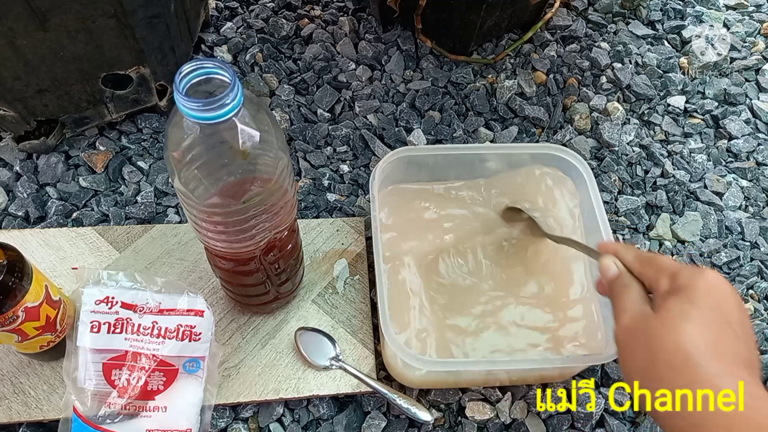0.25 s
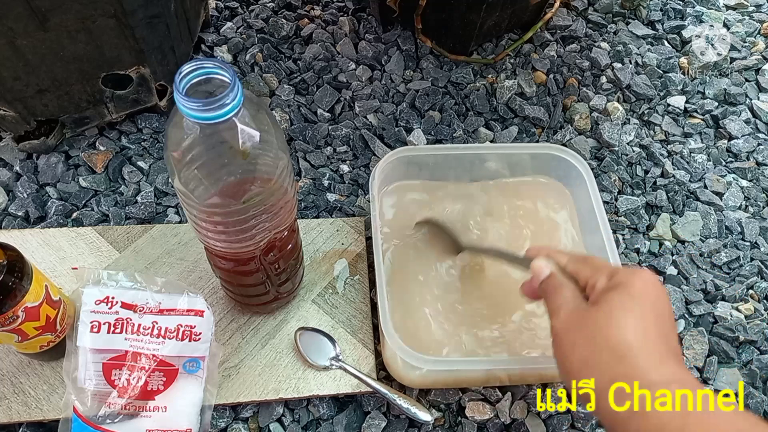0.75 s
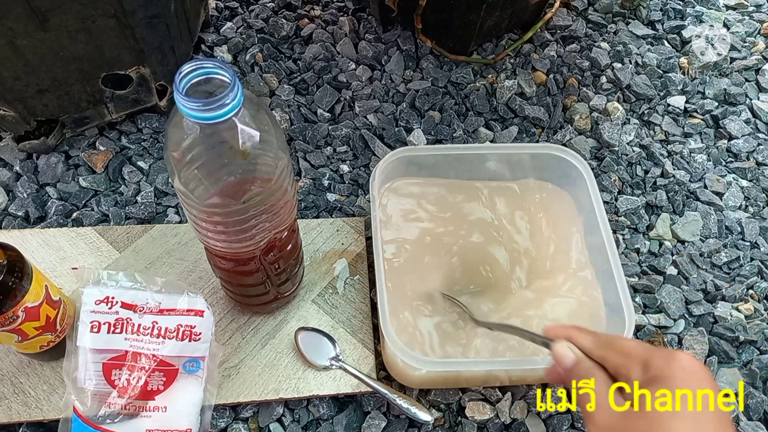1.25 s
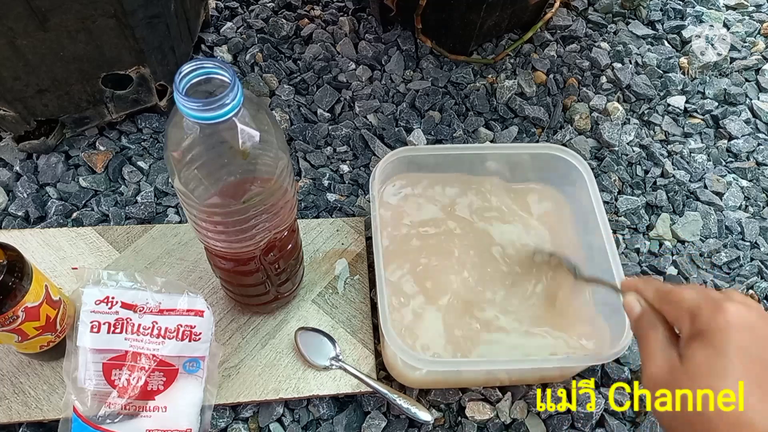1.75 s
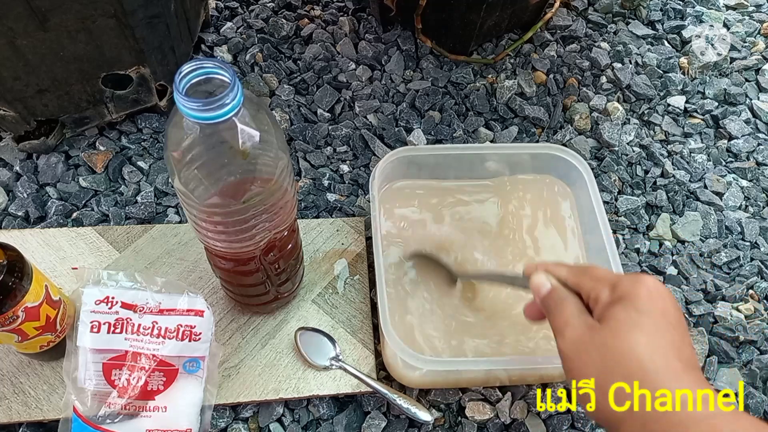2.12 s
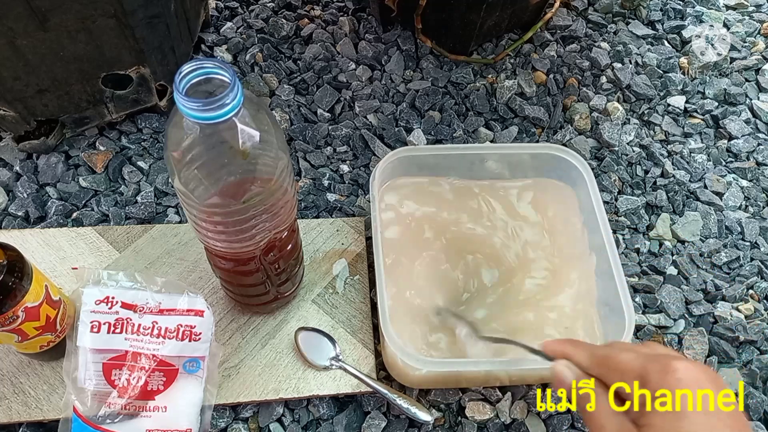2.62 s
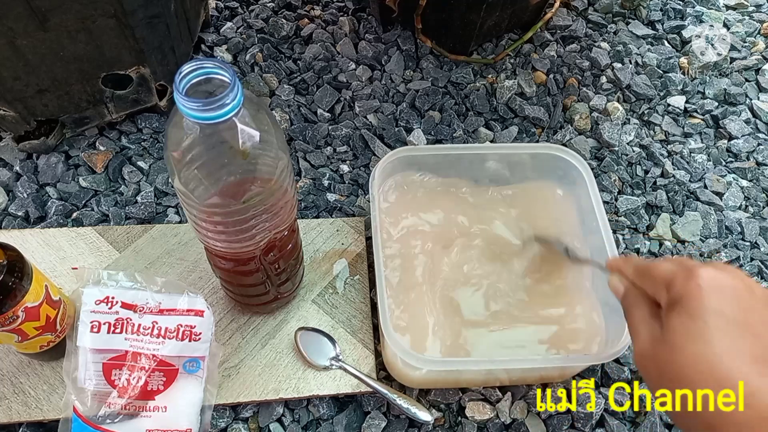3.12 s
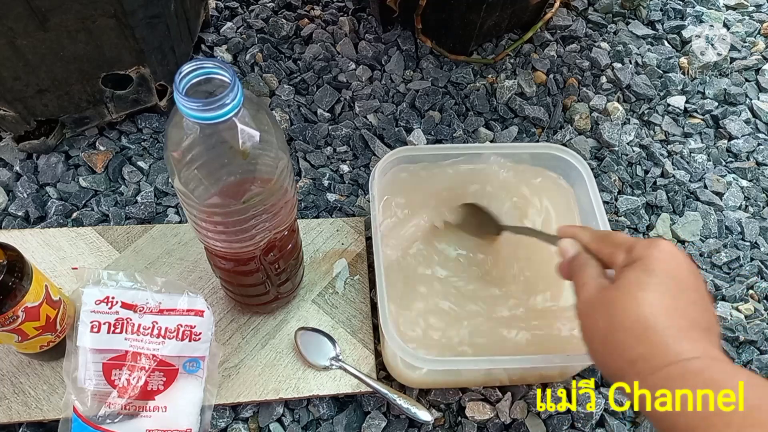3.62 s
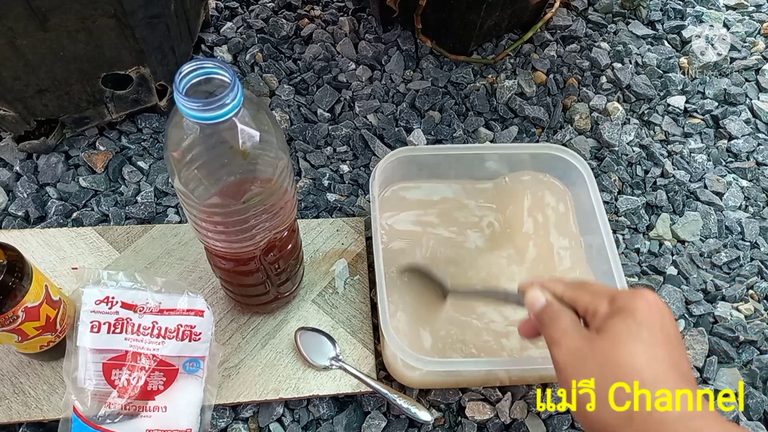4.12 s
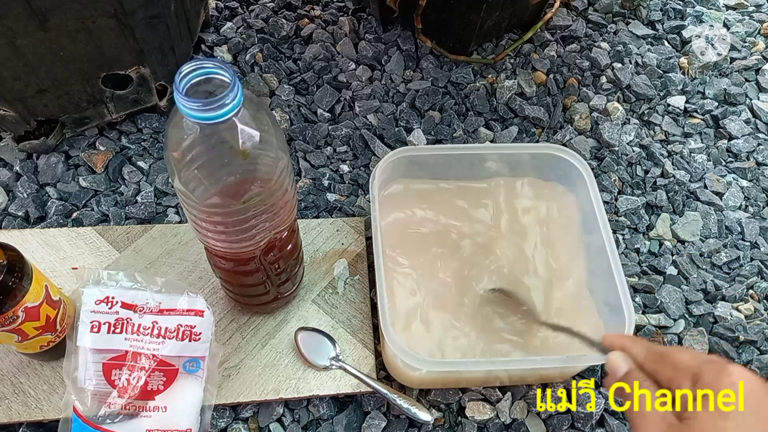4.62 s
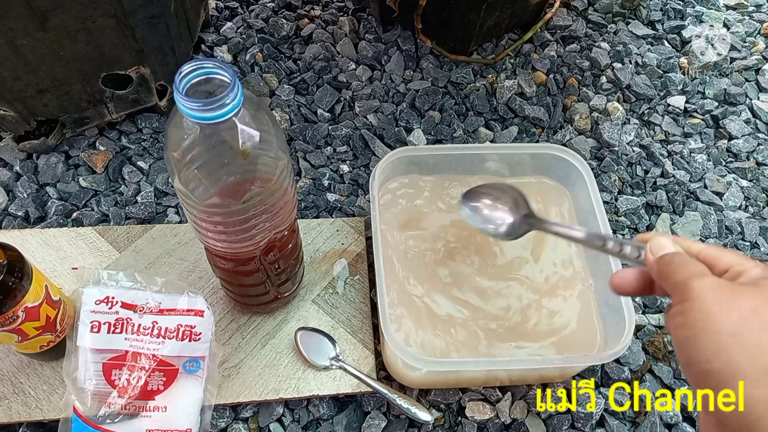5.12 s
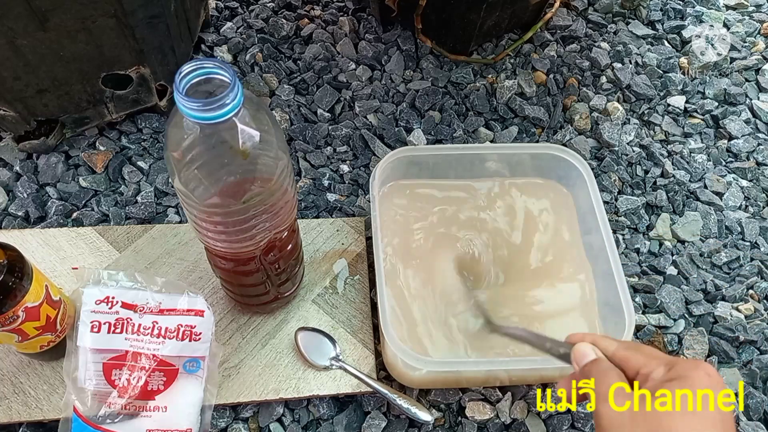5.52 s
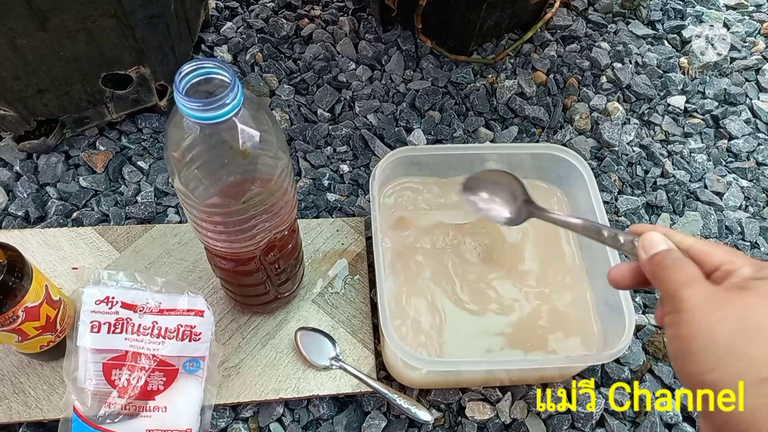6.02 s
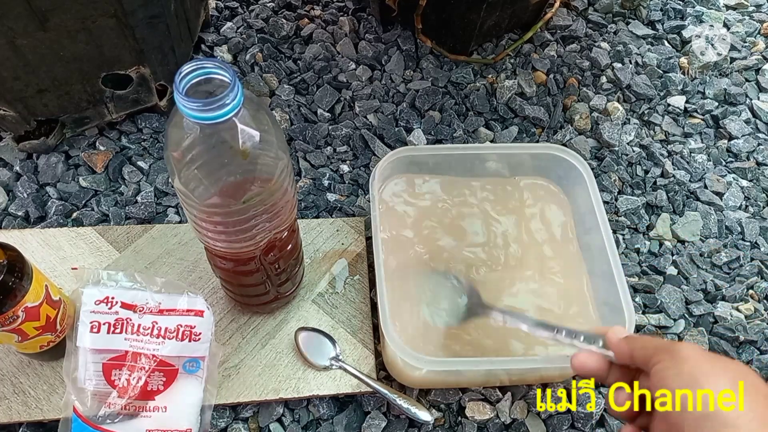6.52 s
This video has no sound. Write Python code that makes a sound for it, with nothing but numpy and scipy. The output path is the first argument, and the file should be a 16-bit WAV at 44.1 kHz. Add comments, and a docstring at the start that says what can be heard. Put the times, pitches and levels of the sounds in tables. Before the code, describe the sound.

A metal spoon stirs thin liquid in a plastic tub outdoors, sloshing and gurgling with dull knocks while wind buffets the microphone.

```python
"""Outdoors, a steel spoon stirs a thin liquid in a plastic tub. From the start leaves hiss, a far motor
drones as two narrow bands of noise, and drag, gurgling bubbles and fizz swell with every stroke.
Pops and gulps come at once as ringing and gliding sines, then knocks that ring the tub walls.
Gusts of coloured noise batter mostly the right microphone port from 1 to 3 s, then ease. After 5.2 s the
spoon strikes near the rim, loudest at about 5.5 s; hiss and fizz grow and gusts return, leaning left."""
import sys
import numpy as np
from scipy import signal
from scipy.fft import rfft, irfft, next_fast_len
from scipy.io import wavfile

SR = 44100
rng = np.random.default_rng(int(sys.argv[2]) if len(sys.argv) > 2 else 0)


def put_to_file(sound):
    """Save the sound as 16-bit audio at rate SR, in the file named by the first command-line argument."""
    columns = np.atleast_2d(sound).T  # one column per channel
    safe = np.clip(columns, -1, 1)
    whole_steps = np.round(safe * 32767)
    wavfile.write(sys.argv[1], SR, whole_steps.astype(np.int16))


N = 297749


def amp(db):
    """dB to gain."""
    return 10 ** (np.asarray(db) / 20)


def rms_one(x):
    """Scale to rms 1."""
    return x / np.sqrt(np.mean(x ** 2, axis=-1, keepdims=True) + 1e-20)


def at_samples(t, values):
    """Draw a curve through its points, one value a sample."""
    return np.interp(np.arange(N) / SR, t, values)


def in_time(rows):
    """Turn each column of a table of times into a curve."""
    s, *columns = np.transpose(rows)
    return [at_samples(s, c) for c in columns]


def drift(rate_hz):
    """Slow chance in two channels: smoothed noise of rms 1, made at every 40th sample."""
    step, warm_up = 40, 2000
    r = np.exp(-2 * np.pi * rate_hz * step / SR)
    noise = rng.standard_normal((2, N // step + 2 + warm_up))
    slow = rms_one(signal.lfilter([1], [1, -2 * r, r * r], noise)[:, warm_up:])
    return np.array([np.interp(np.arange(N) / step, np.arange(len(v)), v) for v in slow])


def colour(x, spectrum):
    """Give a white signal the spectrum of a table; rms 1."""
    size = next_fast_len(N)
    hz, level_db = np.transpose(spectrum)
    log_hz = np.log(np.maximum(np.fft.rfftfreq(size, 1 / SR), 1))
    gain = amp(np.interp(log_hz, np.log(hz), level_db, left=-90, right=-90))
    return rms_one(irfft(rfft(x, size) * gain, size)[..., :N])


def band_pass(band_hz):
    """Second-order band filter as sections."""
    return signal.butter(2, band_hz, "band", fs=SR, output="sos")


def ring(clicks, hz, t60):
    """A resonance: a unit click sets a sine of height 1 ringing, down 60 dB after t60 seconds."""
    r = amp(-60 / (max(t60, .002) * SR))
    w = 2 * np.pi * hz / SR
    return signal.lfilter([0, np.sin(w)], [1, -2 * r * np.cos(w), r * r], clicks + 1e-18)


def ring_time(width_hz):
    """The narrower a resonance, the longer its t60."""
    return np.log(1000) / np.pi / width_hz


def grains(per_s, spread_db, channels):
    """Random clicks of uneven size and sign."""
    shape = (channels, N)
    sizes = amp(spread_db * np.minimum(rng.exponential(1, shape), 5))
    sizes = sizes * rng.choice([-1, 1], shape)
    return sizes * (rng.random(shape) < per_s / SR)


def add(out, s, sound):
    """Mix a short sound in at a time."""
    i = round(s * SR)
    out[i:i + len(sound)] += sound[:N - i]


def above(hz, bright_db):
    """Brightness lifts what lies above 1.8 kHz."""
    return amp(bright_db / (1 + (1800 / hz) ** 8))


def swells(rows, rise, fall):
    """Each row's power envelope: it climbs and sinks at steady dB a second around a hold at 1."""
    t = np.arange(0, N + 64, 64) / SR
    centre, hold = np.transpose(rows)[:2, :, None]
    early = centre - np.abs(hold) / 2 - t
    late = t - centre - np.abs(hold) / 2
    return t, amp(-2 * (rise * np.maximum(early, 0) + fall * np.maximum(late, 0)))


# Spectrum of leaves and far hiss. Each row: frequency in Hz, relative density in dB per Hz.
AIR_SPECTRUM = [(180, 1), (300, 11.5), (480, 0.5), (680, -6.5), (850, -6.5), (1480, -4.5), (2520, -8.5),
                (2890, -4), (6450, -25), (8020, -1), (14400, -35), (15700, -28), (16500, -65)]
# Loudness of the hiss. Each row: time in seconds, level in dB.
AIR_LEVEL = [(0, -56.5), (2.5, -55), (3.5, -62.5), (5.1, -58), (5.3, -52), (5.9, -47.5), (6.2, -44.5),
             (6.75, -45)]
# Loudness of the far motor. Each row: time in seconds, level in dB.
DRONE_LEVEL = [(0, -39), (1, -32), (3, -59.5), (4.5, -53.5), (5, -37), (5.4, -29.5), (5.7, -73),
               (6.75, -49)]
# Hums of the motor. Each row: pitch in Hz, width in Hz, level in dB under the loudness curve.
DRONE_LINES = [(121.1, 14, -4), (211.4, 7.3, -19)]


def background():
    """Smooth hiss, unrelated left and right, and a drone of narrow noise bands common to both."""
    hiss = colour(rng.standard_normal((2, N)), AIR_SPECTRUM)
    air = amp(in_time(AIR_LEVEL)[0] + 0.5 * drift(18)) * hiss
    noise = rng.standard_normal(N)
    drone = sum(amp(db) * rms_one(ring(noise, hz, ring_time(width_hz)))
                for hz, width_hz, db in DRONE_LINES)
    return air + amp(in_time(DRONE_LEVEL)[0]) * drone


# Steady wind on the ports. Each row: time in seconds, rumble level in dB, left minus right in dB.
# Levels here and in the buffets are relative: gusts() lifts both alike.
STEADY_WIND = [(0, -47.5, -9), (.69, -36, 0), (.96, -38.5, -11), (1.3, -63, -1), (1.65, -25, -5),
               (2.0, -33, 22), (2.16, -34, -9), (2.5, -30.5, -19), (2.84, -30.5, 3), (3.12, -67, 12),
               (3.2, -58.5, 6), (3.52, -54.5, 16), (3.8, -45, -7), (4.46, -55.5, 4), (5.3, -47, 0),
               (5.68, -51, 23), (5.9, -33.5, 24), (6.35, -32.5, 39), (6.75, -42, 4)]
# Short swells of the wind. Each row: centre in seconds, hold in seconds, rumble level in dB,
# left minus right in dB.
BUFFETS = [(1.028, 0.011, -23.5, -8), (1.134, 0.012, -17.5, -15.5), (1.219, 0.038, -18.5, -35),
           (1.369, 0.023, -18, -17), (1.424, 0.017, -21.5, -16), (1.512, 0.017, -15.5, -8),
           (1.76, 0.028, -15.5, -26), (1.81, 0.053, -19.5, -4), (1.899, 0.036, -14, -22),
           (1.933, 0.013, -11.5, -16), (2.053, 0.025, -17, -7.5), (2.223, 0.015, -13, -41),
           (2.374, 0.085, -20, -20), (2.62, 0.03, -21.5, -18), (2.725, 0.0099, -15.5, -20),
           (2.774, 0.022, -20, -11), (3.693, 0.095, -40.5, -5.5), (5.805, 0.0086, -25.5, 5),
           (5.963, 0.034, -32, 32), (6.077, 0.008, -26, 27), (6.156, 0.017, -13.5, 2),
           (6.253, 0.0066, -20, 4.5), (6.447, 0.025, -28, 6), (6.55, 0.1, -36, -17)]
BUFFET_RISE_DB_PER_S, BUFFET_FALL_DB_PER_S = 303, 306


def port_powers(level_db, left_minus_right_db):
    """Share the power of a gust out between the left and right port."""
    ratio = amp(2 * left_minus_right_db)
    shares = np.array([ratio, np.ones_like(ratio)]) / (1 + ratio)
    return 4 * amp(2 * level_db) * shares


def gusts():
    """Gain of the wind on each port: steady wind and buffets add in power."""
    t, shape = swells(BUFFETS, BUFFET_RISE_DB_PER_S, BUFFET_FALL_DB_PER_S)
    bumps = port_powers(*np.transpose(BUFFETS)[2:]) @ shape
    steady = port_powers(*in_time(STEADY_WIND))
    return np.sqrt(steady + [at_samples(t, side) for side in bumps])


# Spectra of the slow rumble and fast flutter. Each row: frequency in Hz, relative density in dB per Hz.
RUMBLE_SPECTRUM = [(12, -47), (20, -45), (46, 5), (75, 9), (121, 4.5), (161, -6), (300, -18), (390, -96)]
FLUTTER_SPECTRUM = [(100, -22), (200, 5.5), (300, -4), (450, -17), (700, -29), (1200, -31.5)]
# Single eddies slapping the right port. Each row: time in seconds, relative level in dB, pitch in Hz.
SLAPS = [(1.129, -7, 133), (1.206, -18, 136), (1.507, -1, 142), (1.784, -8, 159), (1.946, 5.5, 164),
         (1.959, -3.5, 206), (2.055, 0, 152), (2.189, -13, 196), (2.21, 8.5, 200), (2.233, 2, 318),
         (2.253, -4.5, 293), (2.366, -2, 212), (2.699, -1, 190), (2.717, -1, 270)]


def wind():
    """Eddies hit each port on its own; the fast flutter comes in sharper lumps and grows less than the rumble."""
    rumble = colour(rng.standard_normal((2, N)), RUMBLE_SPECTRUM)
    rumble = rms_one(rumble * amp(2.5 * drift(25.6)))
    flutter = colour(rng.standard_normal((2, N)), FLUTTER_SPECTRUM)
    flutter = rms_one(flutter * amp(2.9 * drift(43)))
    ports = gusts()
    out = ports * rumble + amp([[-19], [-22.5]]) * ports ** 0.83 * flutter
    for s, level_db, hz in SLAPS:
        turns = np.arange(round(3 * SR / hz)) * hz / SR - .9
        push_suck = -np.tanh(0.77 * np.sin(2 * np.pi * turns)) * np.exp(-(turns / 0.46) ** 2)
        add(out[1], s - .5 / hz, amp(level_db) * push_suck)
    return out


# The liquid between surges. Each row: time in seconds, drag and gurgle in dB (before each layer's trim),
# their brightness above 1.8 kHz in dB, fizz in dB.
SWIRL = [(0, -46, -5, -57.5), (.45, -56, -4, -57), (1, -45.5, -8, -53), (1.35, -86, -10, -53),
         (1.9, -64, -5, -54), (2.5, -58, -4, -56.5), (2.9, -57, -6, -52.5), (3.1, -62, 9, -64),
         (3.55, -56.5, -9, -52), (4.05, -60.5, 3, -53), (4.4, -56, 10, -55.5), (4.8, -76, -5.5, -54),
         (5.13, -60, -5, -54.5), (5.3, -95, 12, -47), (5.85, -68.5, 24, -46.5), (6.15, -74, 27, -39.5),
         (6.5, -77, 5, -49.5), (6.75, -77, 2, -40)]
# Surges as the spoon digs in or turns. Each row: centre in seconds, hold in seconds, then drag and gurgle,
# brightness and fizz in dB as above.
STROKES = [(0.062, 0.13, -41.5, -13, -59), (0.166, 0.085, -40.5, -11, -49), (0.374, 0.067, -52.5, 1.5, -74),
           (0.544, 0.042, -39.5, -2, -44.5), (0.82, 0.059, -42.5, -2.5, -44),
           (0.893, 0.019, -48.5, 12, -47.5), (1.126, 0.082, -53, 9, -59), (1.223, 0.016, -36, -9, -41.5),
           (1.459, 0.046, -39, -7.5, -62), (1.571, 0.11, -42.5, 0, -46), (1.733, 0.086, -49.5, 22, -46),
           (1.798, 0.05, -27, -15.5, -46), (1.951, 0.025, -47, 10, -42), (2.067, 0.11, -40, -10.5, -68),
           (2.183, 0.17, -50, -12, -50), (2.324, 0.096, -46.5, -0.5, -58.5), (2.622, 0.092, -42, -4.5, -55),
           (2.793, 0.049, -36.5, -13, -73), (2.98, 0.072, -46.5, -5, -51), (3.18, 0.023, -71, 13, -49.5),
           (3.218, 0.028, -46, -5, -71), (3.335, 0.055, -52, -9, -53), (3.65, 0.068, -60.5, 16, -50.5),
           (3.776, 0.019, -44, -5, -68), (3.942, 0.1, -54.5, -3, -49.5), (4.308, 0.12, -48.5, -1, -47.5),
           (4.501, 0.084, -49, 0, -48), (4.705, 0.024, -59.5, 14.5, -50), (4.914, 0.044, -57.5, 11.5, -53),
           (5.24, 0.036, -74.5, 25, -46.5), (5.55, 0.029, -39.5, -10, -43), (5.74, 0.13, -49.5, 0, -48),
           (6.165, 0.02, -69, 29, -36.5), (6.398, 0.064, -43, 2, -44), (6.491, 0.064, -35, -7.5, -39.5),
           (6.605, 0.018, -47.5, 7, -34)]
STROKE_RISE_DB_PER_S, STROKE_FALL_DB_PER_S = 235, 218


def stirring():
    """Drag, brightness and fizz in dB: strokes add in power to the swirl; the loudest weigh most in brightness."""
    t, shape = swells(STROKES, STROKE_RISE_DB_PER_S, STROKE_FALL_DB_PER_S)
    drag_db, bright_db, fizz_db = np.transpose(STROKES)[2:]
    power = amp(2 * drag_db)
    drag = at_samples(t, power @ shape)
    weighted = at_samples(t, (power * bright_db) @ shape)
    fizz = at_samples(t, amp(2 * fizz_db) @ shape)
    rest_db, rest_bright_db, rest_fizz_db = in_time(SWIRL)
    rest = amp(2 * rest_db)
    bright = (weighted + rest * rest_bright_db) / (drag + rest)
    return 10 * np.log10(drag + rest), bright, 10 * np.log10(fizz + amp(2 * rest_fizz_db))


BUBBLE_SPREAD_DB = 8.5   # sets how far bubbles sit left or right of the middle


def gurgle(drag_db, bright_db):
    """Countless small bubbles in the wake; alike sizes come in swarms, each swells and rings for tens of cycles."""
    births = grains(1200 * amp(4.3 * drift(12)[0]), 3.26, channels=1)[0]
    pitches = np.geomspace(780, 3400, 24)
    dealt = rng.integers(0, 24, N)   # which size each bubble gets
    swarms = amp(4.35 * np.vstack([drift(2.03) for _ in range(3)]))   # one for every four neighbouring sizes
    out = np.zeros((2, N))
    for k, hz in enumerate(pitches):
        swelling = ring(births * (dealt == k), hz, 39.0 / hz)
        bubbles = rms_one(ring(swelling, hz, 20.0 / hz))
        side = amp(BUBBLE_SPREAD_DB * (-1) ** k * np.array([[1], [-1]]))   # sizes alternate sides
        out += bubbles * above(hz, bright_db) * swarms[k // 4] * side
    return amp(drag_db - 24.0) * out


# Ringing modes of the tub walls. Each row: pitch in Hz, relative level in dB when struck under the liquid,
# when struck near the rim and when rubbed, t60 in seconds when struck.
TUB_MODES = [(337, -40, -43, -18, 0.069), (484, -20, -24, 0, 0.023), (650, -27, -24, -25, 0.0049),
             (845, -7, -5, -21, 0.017), (950, -25, -9.5, -34, 0.036), (1191, -7.5, -9.5, -25, 0.017),
             (1560, -5.5, -7.5, -0.5, 0.015), (1688, -8, -6.5, -3, 0.011), (1900, -1, -36, 3, 0.0082),
             (2183, -10, -24, -3.5, 0.019), (2880, -18.5, -16, -2.5, 0.048), (3160, -15.5, -11, -31, 0.015),
             (4830, -51, -30, -5.5, 0.035), (5200, -8, -27, 2, 0.0064), (7800, -9, -34, 2, 0.0046)]
# Spoon on tub. Each row: time in seconds, relative level in dB, hardness in dB per two octaves.
KNOCKS = [(0.226, -28, 0), (.319, -38.5, 1), (0.397, -36.5, 6), (0.428, -36, 2), (0.521, -17.5, -4),
          (0.54, -9.5, -15), (0.928, -12.5, -9.5), (0.969, -31.5, 0.5), (1.012, -33.5, -5),
          (1.08, -29.5, 1), (1.107, -34, 1), (1.12, -30, -1), (1.149, -33, 6), (1.163, -43, 4),
          (1.204, -34.5, 13), (1.231, -30.5, -3), (1.288, -33, -6), (1.762, -11, -20), (1.782, -21, -2),
          (2.095, -30.5, 7), (2.297, -30.5, 5.5), (2.333, -24.5, -12), (2.569, -27, -5), (2.594, -20.5, -8),
          (2.617, -20.5, -14), (2.821, -11.5, -17), (2.913, -34, 6.5), (3.01, -34, 6), (3.192, -29, -15),
          (3.593, -33, -27), (3.636, -39, 7.5), (3.692, -34, -4), (4.247, -28, -20), (4.28, -46.5, 20),
          (4.656, -42, -4), (4.694, -40.5, 8), (5.425, -13.5, -19), (5.447, -24, -12), (5.526, -9, -17),
          (5.535, -10.5, -6), (5.544, -19, -2), (5.549, 0.5, -10.5), (5.636, -23.5, -28), (5.745, -13, -35),
          (5.775, -31, 6), (6.321, -13, -20.5), (6.401, -11.5, -8), (6.411, -17, -12), (6.474, -29, 11),
          (6.494, -9.5, -16)]
LIFTED_FROM_S = 5.2   # from here the spoon skims the surface and strikes near the rim


def tub(drag_db, bright_db):
    """Knocks and the stick-slip drag of the spoon ring the same wall modes; hard blows reach the high ones."""
    s, level_db, hard_db = np.transpose(KNOCKS)
    luck_db = rng.normal(0, 2.3, (len(s), len(TUB_MODES)))
    t = np.arange(round(.03 * SR)) / SR
    swell = t * np.exp(-t / 0.0017)   # the liquid cushions the blow: the force builds over a few ms
    swell = swell / swell.sum()
    chatter = rng.standard_normal((len(s), len(t))) * np.sqrt(len(t)) * 0.1   # the wet edge skids
    knocks, drag = np.zeros(N), np.zeros(N)
    slips = grains(1200 * amp(4.7 * drift(25)[0]), 4.36, channels=2)
    for k, (hz, deep_db, rim_db, rubbed_db, t60) in enumerate(TUB_MODES):
        struck_db = np.where(s > LIFTED_FROM_S, rim_db, deep_db)
        tilt_db = hard_db * np.log2(hz / 830) / 2
        force = np.zeros(N)
        for at, db, skid in zip(s, level_db + struck_db + luck_db[:, k] + tilt_db, chatter):
            add(force, at - .001, amp(db + 5.5) * swell * (np.cos(2 * np.pi * hz * t) + skid))
        knocks += ring(force, hz, t60)
        wander = amp(rubbed_db + 5.6 * drift(3.0)[0])   # the contact point moves over the wall
        drag += rms_one(ring(slips[k % 2], hz, 0.87 * t60)) * wander * above(hz, bright_db)
    return knocks + amp(drag_db - 19.0) * drag


# Spectrum of the fizz bursts. Each row: frequency in Hz, relative density in dB per Hz.
SPRAY_SPECTRUM = [(2500, 5.5), (4000, 9), (5500, 8.5), (8000, 7), (11000, 6.5), (14500, 3.5), (16500, 24)]
# Droplets bursting and sharp clicks; the one at 2.82 s gives a spoon knock its sharp edge. Each row: time in
# seconds, relative level in dB, centre in Hz.
TICKS = [(0.0863, -35, 4730), (0.4994, -33, 8850), (0.521, -32, 7200), (0.6832, -27.5, 9630),
         (0.7314, -30, 3300), (0.7606, -13, 4470), (0.8, -33.5, 3100), (0.843, -21.5, 4900),
         (0.928, -27, 2740), (1.197, -25.5, 5540), (1.2306, -26.5, 8230), (1.348, -33, 7750),
         (1.4448, -32, 5600), (1.762, -22, 2810), (1.778, -26, 4520), (2.15, -34.5, 5300),
         (2.198, -32.5, 7970), (2.82, -43, 2040), (2.991, -32.5, 8800), (3.7436, -21.5, 1960),
         (3.742, -34.5, 8400), (3.984, -25.5, 12600), (4.261, -24, 6870), (4.3003, -26, 12130),
         (4.422, -31, 2930), (5.1966, -32.5, 7400), (5.217, -30.5, 6900), (5.3295, -32, 8240),
         (5.423, -33, 4300), (5.67, -32.5, 5770), (5.685, -33, 3200), (5.743, -26.5, 6400),
         (6.132, -26, 7260), (6.4935, -29, 3030), (6.5127, -22, 5500), (6.568, -30, 5340)]


def spray(fizz_db):
    """Dense tiny bursts fizz on either side, patchy in pitch; droplets and sharp clicks tick as short noisy
    rings."""
    bursts = colour(grains(2500 * amp(3.5 * drift(45)[0]), 2.75, channels=2), SPRAY_SPECTRUM)
    edges_hz = [2000, 3600, 4800, 6500, 9000, 12000, 17000]
    patches = amp(2.2 * np.vstack([drift(18) for _ in range(3)]))
    fizz = np.zeros((2, N))
    for k, (patch, band) in enumerate(zip(patches, zip(edges_hz, edges_hz[1:]))):
        fizz += patch * signal.sosfilt(band_pass(band), bursts) * (-1) ** k
    out = np.zeros((N, 2))
    t = np.arange(round(0.051 * SR)) / SR
    noise = rng.standard_normal((len(TICKS), len(t), 2))
    for (s, level_db, hz), puff in zip(TICKS, noise):
        fade = amp(level_db - 60 * t / 0.025)[:, None]
        tone = np.sin(2 * np.pi * hz * t)[:, None]
        band = np.minimum([hz / 1.5, hz * 1.8], .45 * SR)
        splash = signal.lfilter(*signal.butter(1, band, "band", fs=SR), puff, axis=0)
        add(out, s, fade * (0.53 * tone + 0.91 * splash))
    return amp(fizz_db) * fizz + out.T


# Small bubbles. Each row: time in seconds, relative level in dB, starting pitch in Hz, t60 in seconds.
POPS = [(.02, -38.5, 1210, 0.049), (0.101, -30, 845, 0.071), (0.133, -26, 974, 0.052),
        (.176, -38, 1360, 0.037), (.351, -36, 1590, .062), (0.413, -36, 1634, 0.072),
        (0.76, -42, 1475, 0.06), (.845, -34, 2150, 0.022), (.845, -27.5, 2810, 0.026),
        (.8939, -32.5, 2720, 0.04), (1.069, -41, 1295, 0.09), (1.4294, -35, 1560, 0.036),
        (1.458, -13, 1300, 0.038), (1.5018, -34, 2950, 0.019), (1.529, -37.5, 3020, 0.041),
        (1.596, -38, 2830, 0.03), (1.637, -33, 803, 0.02), (1.6798, -22.5, 1930, 0.037),
        (1.6853, -23.5, 3073, 0.039), (1.706, -34, 2720, 0.1), (1.7127, -34, 1850, 0.055),
        (1.726, -30, 1850, .03), (1.739, -29.5, 2200, 0.047), (1.77, -32, 3090, 0.048),
        (1.911, -40.5, 2940, 0.055), (2.004, -32.5, 1730, 0.072), (2.1026, -30.5, 3080, 0.031),
        (2.38, -32, 2900, 0.018), (2.473, -43, 1910, 0.026), (2.616, -22, 1590, 0.024),
        (2.666, -31, 2140, 0.012), (2.837, -27, 980, 0.062), (2.912, -49, 2270, .035),
        (2.9302, -36.5, 2190, 0.035), (2.986, -40, 1710, 0.076), (3.078, -28, 1900, 0.017),
        (3.1753, -35.5, 3310, 0.022), (3.195, -33, 815, 0.05), (3.303, -46, 1040, 0.12),
        (3.337, -34.5, 1470, 0.068), (3.338, -32.5, 1170, 0.055), (3.5, -45, 840, 0.044),
        (3.523, -41.5, 3290, 0.029), (3.574, -43, 3050, .02), (3.744, -22.5, 1213, 0.041),
        (3.844, -43, 1560, .04), (4.338, -41.5, 1396, 0.11), (4.423, -27, 1764, 0.042),
        (4.437, -38, 2930, 0.061), (4.45, -37.5, 1815, 0.1), (4.469, -39, 1330, .072),
        (4.499, -36, 1410, 0.064), (4.546, -36, 1134, 0.12), (4.862, -29.5, 2004, 0.057),
        (4.885, -28, 1560, 0.02), (5.251, -42.5, 3410, 0.056), (5.48, -40, 800, 0.032),
        (5.67, -25, 1590, 0.038), (5.904, -32, 1537, 0.032), (6.0062, -27.5, 2830, 0.016),
        (6.1586, -27, 2330, 0.021), (6.403, -33, 1640, 0.019), (6.432, -29, 1005, 0.037),
        (6.513, -13, 1175, 0.035)]


def pops():
    """A freed bubble rings as a damped sine creeping up in pitch; the film that tears adds a wet crack."""
    out = np.zeros((N, 2))
    t = np.arange(round(.12 * SR)) / SR
    places = amp(BUBBLE_SPREAD_DB * rng.uniform(-0.69, 1, (len(POPS), 1)) * [1, -1])
    noise = rng.standard_normal((len(POPS), len(t)))
    for (s, level_db, hz, t60), tear, place in zip(POPS, noise, places):
        tone = np.sin(2 * np.pi * hz * (t + 0.67 * t ** 2)) * (1 - np.exp(-t / 0.00091))
        crack = signal.lfilter(*signal.butter(2, [hz / 1.02, hz * 1.12], "band", fs=SR), tear)
        fade = amp(level_db - 60 * t / max(t60, .004))
        add(out, s, np.outer(fade * (1.08 * tone + 3.8 * crack), place))
    return out.T


# Air pockets closing. Each row: start in seconds, length in seconds, start pitch in Hz, end pitch in Hz,
# relative level in dB.
GULPS = [(0.057, 0.056, 760, 1070, -33.5), (0.06, 0.045, 1283, 1380, -31.5),
         (0.221, 0.032, 1105, 1250, -33), (0.781, 0.032, 814, 1240, -30.5), (1.441, 0.048, 916, 1900, -19),
         (1.815, .03, 773, 1210, -29), (1.902, 0.069, 894, 970, -33.5), (1.981, 0.028, 950, 1810, -23),
         (2.092, 0.026, 958, 1190, -18.5), (2.237, 0.042, 848, 1180, -32), (2.273, 0.027, 1720, 2120, -42),
         (2.598, .048, 1100, 1350, -33), (2.771, 0.015, 944, 1550, -20.5), (2.779, 0.029, 1000, 680, -36),
         (2.922, 0.037, 886, 1380, -38.5), (3.433, 0.058, 762, 1220, -36), (4.145, 0.051, 720, 2010, -33.5),
         (4.434, 0.025, 2320, 1730, -38), (4.469, 0.022, 1530, 1200, -33.5),
         (4.885, 0.044, 1440, 1240, -40.5), (6.51, 0.026, 1110, 1380, -23)]
GULP_WOBBLE = .02   # rms, share of the pitch


def gulps():
    """A shrinking cavity sings a mostly rising glide, faster toward its end; wobbling walls make it flutter."""
    out, wobble = np.zeros(N), drift(84)
    for s, length, start_hz, end_hz, level_db in GULPS:
        u = np.linspace(0, 1, round(length * SR))
        glide = start_hz * (end_hz / start_hz) ** (u ** 1.3)
        hz = glide * (1 + GULP_WOBBLE * wobble[0, round(s * SR):][:len(u)])
        shape = (1 - np.exp(-u * length / 0.0043)) * amp(-12.0 * u) * np.sqrt(1 - u ** 4)
        add(out, s, amp(level_db) * shape * np.sin(2 * np.pi * np.cumsum(hz) / SR))
    rough = signal.lfilter([.05], [1, -.95], rng.standard_normal(N))   # the wet mouth sputters
    return out * amp(3.2 * wobble[1]) * (1 + 0.04 * rms_one(rough))


# The spoon's edge sings on the floor of the tub, holding one wall mode. Each row: centre in seconds,
# hold in seconds, level in dB, a pitch in Hz that picks the nearest mode.
SKIDS = [(0.115, 0.053, -50.5, 5200), (.87, 0.13, -57, 2950), (1.564, 0.089, -51.5, 2903),
         (1.625, 0.11, -59, 1900), (1.873, 0.07, -55, 1590), (2.06, 0.06, -54, 1560),
         (2.45, 0.26, -62, 1583), (2.572, 0.082, -57, 5200), (2.684, 0.29, -55.5, 1540),
         (3.67, 0.026, -51, 2900), (4.826, 0.047, -53.5, 1900)]
SKID_FADE_DB_PER_S, SKID_WIDTH = 400, 0.07   # width of the first resonance as a share of its pitch


def skids():
    """Steady rubbing drives a single mode, heard as a narrow rough band."""
    t, shape = swells(SKIDS, SKID_FADE_DB_PER_S, SKID_FADE_DB_PER_S)
    rub = grains(2500, 4.8, channels=1)[0]
    out = np.zeros(N)
    for (_, _, level_db, near_hz), power in zip(SKIDS, shape):
        mode_hz = min((row[0] for row in TUB_MODES), key=lambda hz: abs(hz - near_hz))
        t60 = ring_time(SKID_WIDTH * mode_hz)
        song = rms_one(ring(ring(rub, mode_hz, t60), mode_hz, t60 / 2))
        out += amp(level_db) * at_samples(t, np.sqrt(power)) * song
    return out


def nearby(x):
    """Tub rim and ground return short echoes, unlike left and right, so the treble spreads wide."""
    # each echo: delay in seconds, level in dB
    left = [(.00045, -11.5), (.0013, -19.5), (.0037, -24)]
    right = [(.0011, -21.5), (.0019, -51), (.0047, -14.5)]
    return np.array([v + sum(amp(db) * np.roll(v, round(s * SR)) for s, db in side)
                     for v, side in zip(x, [left, right])])


def scene():
    """The tub in the middle, wind and hiss around."""
    drag_db, bright_db, fizz_db = stirring()
    liquid = gurgle(drag_db, bright_db) + pops() + gulps() + skids()
    stirred_tub = nearby(tub(drag_db, bright_db) + liquid)
    return stirred_tub + spray(fizz_db) + wind() + background()


PORT_CUT_HZ, TOP_CUT_HZ = 29.6, 16500


def record(dry):
    """The ports lose the lowest bass, the strongest peaks are rounded off, the top is cut."""
    x = signal.sosfilt(signal.butter(2, PORT_CUT_HZ, "high", fs=SR, output="sos"), dry)
    x = x / (1 + x ** 4) ** (1 / 4)
    return signal.sosfilt(signal.cheby2(12, 70, TOP_CUT_HZ, fs=SR, output="sos"), x)


dry = scene()
out = record(dry)
put_to_file(out)
```